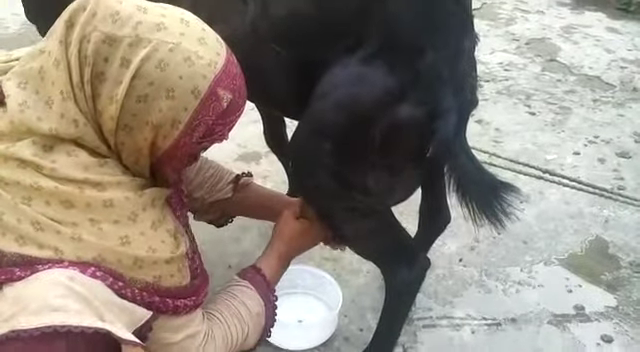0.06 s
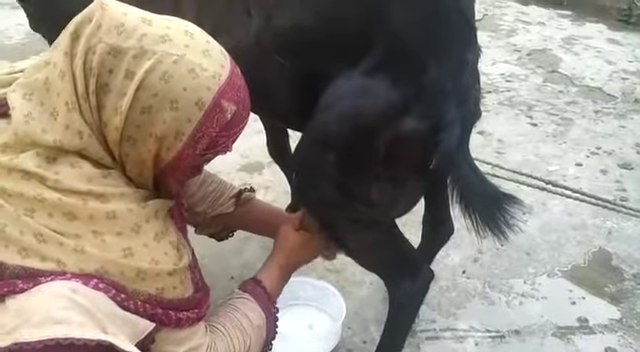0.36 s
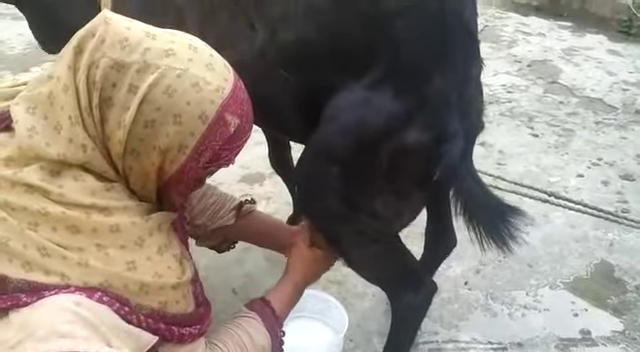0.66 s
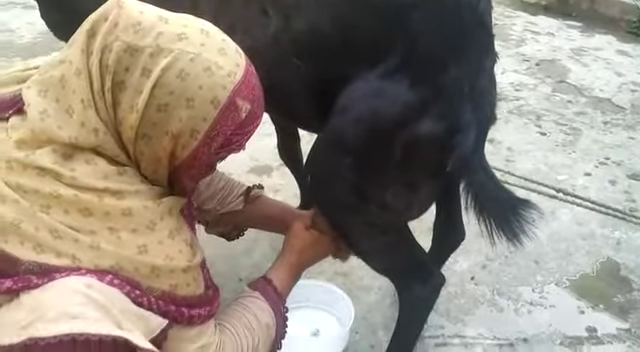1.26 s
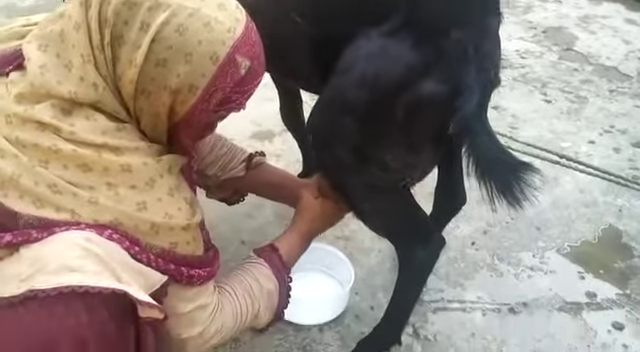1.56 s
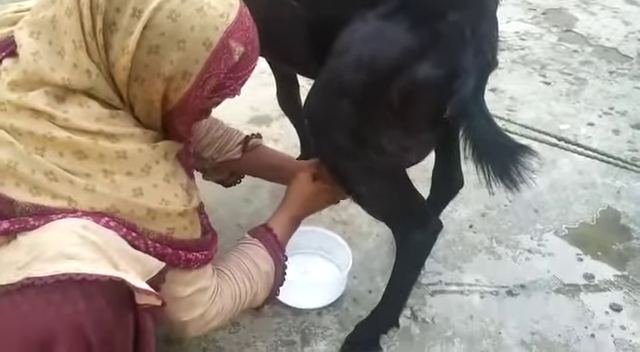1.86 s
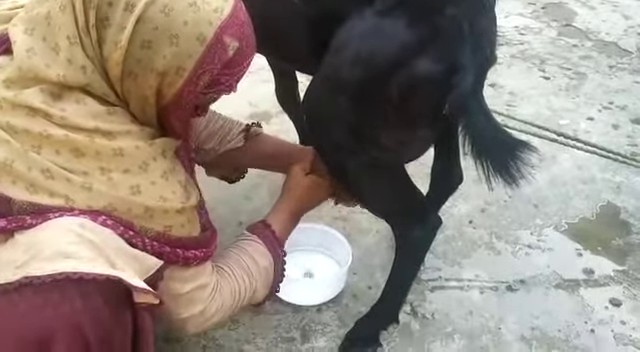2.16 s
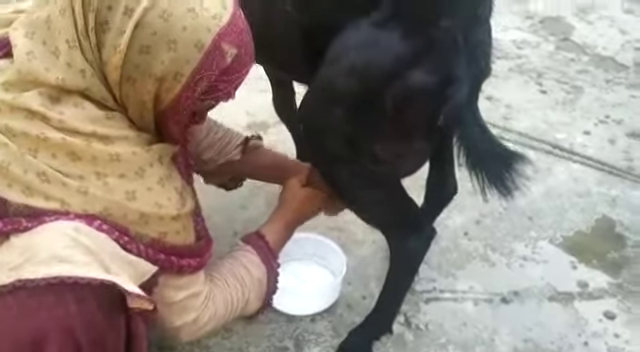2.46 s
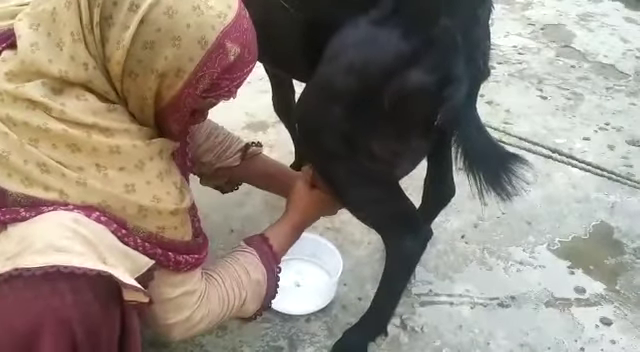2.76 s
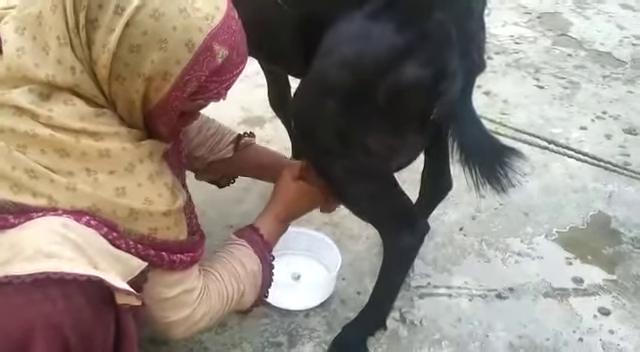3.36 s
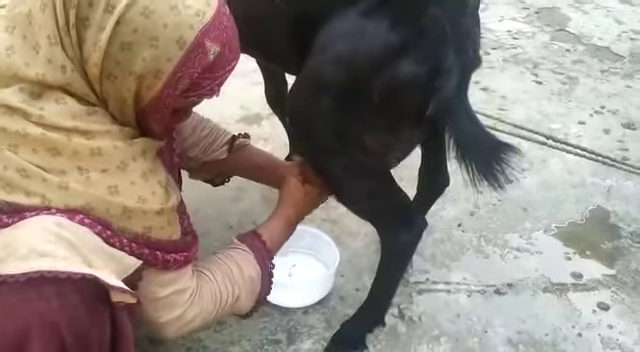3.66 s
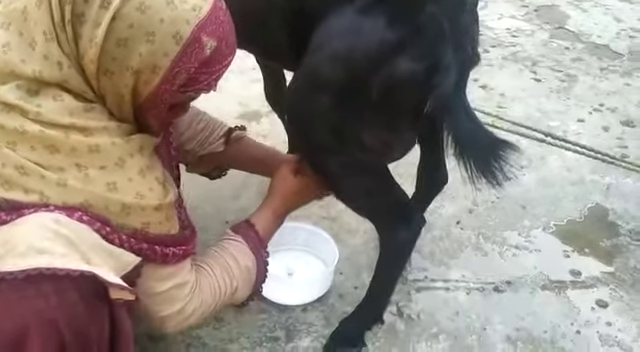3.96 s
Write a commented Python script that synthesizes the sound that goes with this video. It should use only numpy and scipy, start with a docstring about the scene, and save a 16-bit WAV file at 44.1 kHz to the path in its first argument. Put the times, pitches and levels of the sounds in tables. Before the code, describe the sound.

Thin jets of milk hiss into a small metal bowl of froth about twice a second as a goat is milked by hand. Fat drops slap in later, with two dull taps. The milk sits left, over faint yard rumble.

```python
"""A thin jet hisses into a small metal bowl of frothy milk about twice a second: a goat milked by hand.
Each jet is a dense hail of droplets and bursting bubbles, coloured by the bowl; when it strikes deep
it also rings the bowl's hollow, and now and then a fat drop slaps in. Two dry taps, a few soft bumps,
faint far-off tones and the low rumble of a yard lie beneath. The milk sits almost wholly on the left."""
import sys
import numpy as np
from scipy import signal
from scipy.fft import rfft, irfft, next_fast_len
from scipy.io import wavfile
from scipy.ndimage import uniform_filter1d, map_coordinates

SR = 44100
rng = np.random.default_rng(int(sys.argv[2]) if len(sys.argv) > 2 else 0)


def log_audio(samples):
    """Write samples as a 16-bit WAV file to the path given in sys.argv[1]."""
    # one column per channel
    frames = np.atleast_2d(samples).T
    # limit to full scale, then quantise
    limited = np.clip(frames, -1, 1)
    pcm = np.round(limited * 32767).astype(np.int16)
    wavfile.write(sys.argv[1], SR, pcm)


N = 176400


def amp(db):
    """Decibels to gain."""
    return 10 ** (np.asarray(db) / 20)


def unit(x):
    """Scale to rms 1."""
    return x / np.sqrt(np.mean(x ** 2) + 1e-20)


def pan(db):
    """Stereo gains that set the left db above the right."""
    return amp([[db / 2], [-db / 2]])


def clock():
    """Time of every sample in seconds."""
    return np.arange(N) / SR


def wobble(rate):
    """A smooth random curve, rate knots a second."""
    return map_coordinates(rng.standard_normal(2000), [clock() * rate], mode="wrap")


def swell(t, middle, length):
    """A rounded hump, 1 at its middle."""
    return np.exp(-np.abs(2 * (t - middle) / length) ** 3)


def burst(start, decay_s):
    """A quick attack and an exponential fall, peaking near 1."""
    age = np.maximum(clock() - start, 0) / decay_s
    return 2 * np.exp(-age) * (1 - np.exp(-4 * age))


def colour(points, hz):
    """Gain of an EQ curve through (Hz, dB) points on a log axis."""
    freqs, db = np.transpose(points)
    return amp(np.interp(np.log(hz + 1), np.log(freqs + 1), db))


def band(hz, lo, hi, order=16):
    """Gain of a band-pass with soft edges."""
    return ((1 + (lo / (hz + 1)) ** order) * (1 + (hz / hi) ** order)) ** -.5


def filtered(x, response):
    """Shape x with a frequency response."""
    size = next_fast_len(N + SR // 4)
    return irfft(rfft(x, size) * response(np.fft.rfftfreq(size, 1 / SR)), size)[..., :N]


def noise(points):
    """Noise of rms 1, coloured by (Hz, dB) points."""
    return unit(filtered(rng.standard_normal(N), lambda hz: colour(points, hz)))


def droplets(per_s=6000, spread_db=1):
    """The broken-up jet lands as a hail of clicks, over an equally loud fine mist."""
    hits = (rng.random(N) < per_s / SR) * amp(-spread_db * rng.standard_normal(N))
    mist = rng.standard_normal(N)
    return unit(unit(hits - hits.mean()) + mist)


def bubbles(per_s=1500, decay_cycles=20, spread_db=2.8, rise=.02):
    """Tiny bubbles burst in the froth, each a short ring that rises a little in pitch."""
    froth_rng = np.random.default_rng(rng.integers(1 << 30))
    when, pitch, size = froth_rng.random((int(per_s * N / SR), 3)).T[..., None]
    hz = 1100 * 9 ** pitch
    samples = np.arange(900)
    age = hz * samples / SR / decay_cycles
    strength = amp(spread_db * np.minimum(-np.log(1 - size), 3)) * hz
    envelope = strength * np.exp(-age) * (1 - samples / len(samples))
    rings = envelope * np.sin(2 * np.pi * decay_cycles * age * (1 + rise * np.tanh(age)))
    positions = (when * N).astype(int) + samples
    return unit(np.bincount(positions.ravel(), rings.ravel(), N)[:N])


def pockets(hiss, spray_hz=8200, patchy_db=1.68):
    """The jet digs pockets in the froth that sing for a moment, recolouring the hiss at steady power."""
    # Froth resonances. Each row: middle and length in seconds, pitch and width in Hz, lift in dB.
    resonances = [(0.062, 0.16, 4350, 700, 8.5), (0.2, 0.11, 3680, 420, 13), (0.505, 0.12, 4400, 520, 9),
                  (.51, 0.2, 1820, 220, 11), (0.72, 0.36, 2690, 400, 6), (0.67, 0.13, 4150, 600, 6),
                  (0.74, 0.12, 5270, 260, 6), (0.758, 0.44, 1120, 160, 14), (1.043, 0.2, 4650, 700, 8),
                  (1.245, 0.19, 4680, 750, 10), (1.28, 0.25, 2080, 520, 6), (1.65, 0.42, 2600, 220, 4),
                  (1.66, 0.12, 2400, 520, 8), (1.67, 0.2, 4350, 1000, 3), (1.66, 0.11, 1270, 180, 16.5),
                  (1.973, 0.18, 4480, 700, 8), (2.0, 0.26, 2850, 260, 5), (2.206, 0.21, 1880, 500, 5),
                  (2.24, 0.2, 4850, 900, 6), (2.402, 0.065, 2230, 403, 14), (2.62, 0.12, 5630, 2390, 9),
                  (2.82, 0.15, 4950, 1010, 8), (3.0, 0.17, 3550, 1400, 4), (3.02, 0.27, 6450, 1400, 8),
                  (3.2, 0.16, 4850, 700, 10), (3.36, 0.22, 4850, 1150, 8), (3.39, 0.14, 1850, 350, 5),
                  (3.59, 0.16, 4900, 750, 8), (3.85, 0.5, 4880, 720, 6.5)]
    # Fine spray brightens the top. Each row: middle and length in seconds, lift in dB.
    sprays = [(0.572, 0.23, 6.5), (1.43, 0.53, 2), (2.614, 0.16, 10)]
    hz, t, spectrum = signal.stft(hiss, SR, nperseg=512)
    f = hz[:, None]
    pocket_db = sum(db * swell(t, middle, length) / (1 + (2 * (f - pitch) / width) ** 4)
                    for middle, length, pitch, width, db in resonances)
    spray_db = sum(db * swell(t, middle, length) for middle, length, db in sprays)
    patches = uniform_filter1d(rng.standard_normal(spectrum.shape), size=4, axis=0)
    patches = unit(uniform_filter1d(patches, size=12, axis=1))
    gain = amp(pocket_db + band(f, spray_hz, SR, order=8) * spray_db + patchy_db * patches)
    gain /= np.sqrt(np.average(gain ** 2, axis=0, weights=bowl(hz) ** 2))  # as heard through the bowl
    return signal.istft(spectrum * gain, SR, nperseg=512)[1][:N]


def bowl(hz):
    """The metal bowl's response: narrow modes on top of the broad colour of the hiss."""
    # Colour of the hiss. Each row: frequency in Hz, gain in dB.
    hiss_eq = [(600, -20), (1100, -29), (1390, -17), (1530, -18), (1810, -10), (2400, -7), (2700, -6),
               (3250, -4.5), (3700, -6), (4150, -3), (4700, -3.5), (5300, -4.5), (6000, -8), (7100, -9),
               (8700, -12.5), (9700, -22), (10800, -26.5), (13900, -24.5), (15500, -31)]
    # Modes of the bowl. Each row: pitch and width in Hz, lift over the hiss in dB.
    modes = [(1412, 40, 4), (1564, 20, 4), (1657, 25, 4), (1790, 40, 3), (1857, 38, 6), (1958, 18, 6),
             (2028, 20, 4), (2290, 35, 5), (2605, 55, 6), (2724, 18, 5), (2835, 60, 5), (2950, 35, 4),
             (3610, 55, 5), (3723, 70, 5), (3990, 75, 4), (4210, 60, 3), (4690, 120, 3), (4980, 60, 3),
             (5438, 32, 4), (6815, 60, 3), (7110, 130, 4.5)]
    lift_db = sum(db / (1 + (2 * (hz - pitch) / width) ** 2) for pitch, width, db in modes)
    return colour(hiss_eq, hz) * amp(lift_db)


def jets(froth_share=0.1, split_hz=1735, wash_db=-27.5, flutter_db=0.5, sputter_db=.3):
    """Droplets and bubbles hiss in the bowl over a low splash, swelling with each squeeze."""
    # Jet envelope, one list per squirt. Each point: time in seconds, relative level in dB.
    squirts = [
        [(0.0, -29.5), (0.132, -29), (0.148, -25.5), (0.2, -27), (0.342, -33.5), (0.364, -38), (0.368, -39),
         (0.38, -42)],
        [(0.4, -40.5), (0.452, -35.5), (0.498, -30), (0.598, -26.5), (0.628, -23), (0.79, -27.5),
         (0.862, -33.5), (0.912, -40.5)],
        [(0.925, -34), (1.053, -25.5), (1.067, -27.5), (1.153, -31), (1.233, -25.5), (1.341, -27.5),
         (1.397, -36.5), (1.41, -38)],
        [(1.43, -38.5), (1.458, -32.5), (1.642, -24), (1.76, -30.5), (1.844, -41.5), (1.876, -33.5),
         (1.888, -40), (1.892, -36)],
        [(1.898, -29.5), (2.002, -25.5), (2.138, -30.5), (2.186, -27), (2.296, -28.5), (2.404, -38.5),
         (2.416, -38.5), (2.53, -49), (2.565, -54)],
        [(2.575, -44.5), (2.619, -40.5), (2.625, -36.5), (2.691, -35), (2.813, -24), (2.86, -28),
         (2.895, -29.5)],
        [(2.922, -29), (2.938, -26), (3.017, -26), (3.075, -31), (3.135, -30), (3.146, -32)],
        [(3.152, -34), (3.16, -27), (3.252, -27.5), (3.29, -25.5), (3.325, -25), (3.42, -23.5), (3.475, -29),
         (3.527, -33.5)],
        [(3.54, -27.5), (3.692, -24), (3.926, -30.5), (4.0, -28.5)],
    ]
    # The low splash rides on that envelope. Each row: time in seconds, relative level in dB.
    splash_levels = [(0, -14), (.2, -16), (.38, -18.5), (.53, -37.5), (.72, -13), (0.878, -16.5), (1, -23),
                     (1.17, -9), (1.38, -15.5), (1.53, -27), (1.67, -18), (1.8, -22), (2, -17.5),
                     (2.2, -17), (2.55, -14.5), (2.85, -18.5), (3.03, -26.5), (3.18, -12), (3.38, -15.5),
                     (3.6, -20), (3.8, -16.5), (4, -16.5)]
    # Dull wash of the milk. Each row: frequency in Hz, gain in dB.
    wash_eq = [(150, 2), (250, -6), (400, -7.5), (600, -0.5), (900, 2.5), (1300, -1), (2500, -10)]
    jet_db = np.interp(clock(), *np.vstack(squirts).T)
    splash_db = np.interp(clock(), *np.transpose(splash_levels))
    hail = np.sqrt(1 - froth_share) * droplets() + np.sqrt(froth_share) * bubbles()
    hiss = filtered(pockets(hail), bowl)
    sizzle = amp(1.5) * unit(filtered(hiss, lambda hz: band(hz, split_hz, SR)))
    splash = amp(3) * unit(filtered(hiss, lambda hz: band(hz, 1090, split_hz)))
    splash *= amp(splash_db + flutter_db * wobble(60))
    wash = amp(wash_db) * noise(wash_eq)
    return amp(jet_db + sputter_db * wobble(110)) * (sizzle + splash + wash)


def hollow(attack_s=0.049, release_s=0.13):
    """Droplets drive the low ring of the bowl's hollow while a jet strikes deep."""
    # Deep strikes. Each row: start and length in seconds, relative level in dB.
    strikes = [(-.03, 0.46, -49.5), (0.614, 0.24, -51.5), (0.94, 0.29, -45), (1.624, 0.19, -50),
               (1.845, 0.38, -47), (2.66, 0.1, -56), (3.128, 0.24, -46), (3.372, 0.63, -54),
               (3.92, .15, -53)]
    # Modes of the hollow. Each row: pitch and width in Hz, gain in dB.
    modes = [(803.4, 30, 5), (925, 31, 5), (1090, 400, -8.5)]

    def ring(hz):
        """Resonators summed in alternating polarity."""
        return sum((-1) ** k * amp(db) * 1j * hz * width / (pitch ** 2 - hz ** 2 + 1j * hz * width)
                   for k, (pitch, width, db) in enumerate(modes))

    t, drive = clock(), np.zeros(N)
    for start, length, db in strikes:
        attack = np.clip((t - start) / attack_s, 0, 1)
        release = np.clip((start + length - t) / release_s + .5, 0, 1)
        drive += amp(db) * attack * release
    return drive * unit(filtered(droplets(), lambda hz: band(hz, 730, 2100) * ring(hz)))


def yard(rumble_db=-58, shared_power=0.25, hum_hz=81):
    """A wide outdoor bed of low rumble and faint hiss, with a wavering hum to the left."""
    # Colour of the bed. Each row: frequency in Hz, gain in dB.
    yard_eq = [(20, -28), (34, -10), (52, 5.5), (85, -6.5), (120, -2.5), (220, -13.5), (420, -15),
               (700, -20), (1500, -22.5), (4500, -26), (8000, -33), (10500, -41.5), (13500, -34),
               (16000, -41)]
    centre = np.sqrt(shared_power) * noise(yard_eq)
    sides = np.sqrt(1 - shared_power) * np.array([noise(yard_eq), noise(yard_eq)])
    hum = amp(-54 + 2.5 * wobble(19)) * np.sin(2 * np.pi * hum_hz * clock() + 1.4 * wobble(11))
    return amp(rumble_db) * (centre + sides) + hum * amp([[0], [-20]])


def air():
    """A faint, steady, airy background."""
    # Colour of the air. Each row: frequency in Hz, gain in dB.
    air_eq = [(120, -8), (260, -1.5), (350, 2.5), (500, -2.5), (900, -5.5), (3000, -23), (7000, -12),
              (10500, -11.5), (14000, -13), (16000, -19)]
    return amp(-51) * noise(air_eq)


def drones(fade_s=0.17, waver_db=0.82):
    """Faint far-off tones, unsteady in level and pitch."""
    # Each row: start and end in seconds, pitch in Hz, relative level in dB.
    tones = [(-.1, 2.1, 267.5, -62), (2.15, 3.7, 325.5, -62), (2.7, 2.98, 331, -47.5)]
    t, out = clock(), np.zeros(N)
    for start, end, hz, db in tones:
        fade = np.clip(np.minimum(t - start, end - t) / fade_s, 0, 1)
        out += amp(db + waver_db * wobble(7.48)) * fade * np.sin(2 * np.pi * hz * t + wobble(14))
    return out


def splats(decay_s=0.0048, edge_ratio=1.25):
    """Single fat drops slap the bowl, each a flick of noise around its own pitch."""
    # Each row: start in seconds, relative level in dB, pitch in Hz.
    drops = [(0.923, -31, 4600), (1.896, -28, 4330), (2.686, -23, 4950), (3.011, -24, 3930),
             (3.092, -20.5, 6300), (3.127, -23, 6840), (3.132, -27.5, 6350), (3.157, -28, 4860),
             (3.590, -16.5, 5400), (3.644, -15.5, 4900), (3.693, -22, 4300)]
    out = np.zeros(N)
    for start, db, pitch in drops:
        lo, hi = pitch / edge_ratio, pitch * edge_ratio
        slap = unit(filtered(rng.standard_normal(N), lambda hz: bowl(hz) * band(hz, lo, hi)))
        out += amp(db) * burst(start, decay_s) * slap
    return out


def bumps():
    """Soft shuffling bumps close to the microphones: short bursts of bassy noise."""
    # Each row: start in seconds, level in dB, decay in seconds, left over right in dB.
    thuds = [(2.416, -49, 0.01, 6), (2.69, -51.5, 0.021, -15), (2.785, -48.5, 0.037, -5),
             (3.18, -52, 0.029, 3)]
    # Colour of a bump. Each row: frequency in Hz, gain in dB.
    bump_eq = [(25, -27), (50, 0), (150, 8.5), (250, 0), (450, -5), (580, -20), (2000, -51)]
    drive = sum(amp(db) * pan(pan_db) * burst(start, decay) for start, db, decay, pan_db in thuds)
    return drive * np.array([noise(bump_eq), noise(bump_eq)])


def taps(body_hz=200, top_hz=410):
    """Dry taps on the recorder's case, each one dull push with no ring."""
    # Each row: start in seconds, peak before panning in dB, low edge in Hz, left over right in dB.
    knocks = [(2.4505, -42.5, 170, 17), (2.6718, -35.5, 62, -20)]
    body = signal.butter(1, body_hz, fs=SR, output="sos")
    out = np.zeros((2, N))
    for start, db, low_hz, pan_db in knocks:
        case = signal.butter(4, [low_hz, top_hz], "bandpass", fs=SR, output="sos")
        push = signal.sosfilt(np.vstack([case, body]), signal.unit_impulse(N, int(start * SR)))
        out += amp(db) * pan(pan_db) * push / np.abs(push).max()
    return out


def scene():
    """Milk, far tones and air sit hard left; taps, bumps and the yard reach both sides."""
    left_layers = jets() + drones() + amp(-3.5) * (hollow() + splats() + air())
    return left_layers * amp([[4], [-48]]) + taps() + bumps() + yard()


def record(dry):
    """The recorder rolls off the bass below 45 Hz and keeps nothing above 15750 Hz."""
    return filtered(dry, lambda hz: band(hz, 45, SR, order=8) * (hz < 15750))


dry = scene()
out = record(dry)
log_audio(out)
```